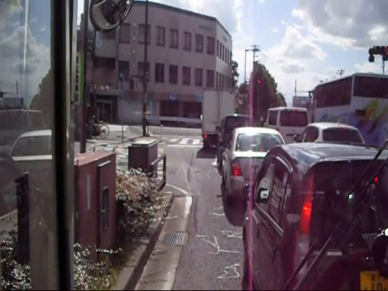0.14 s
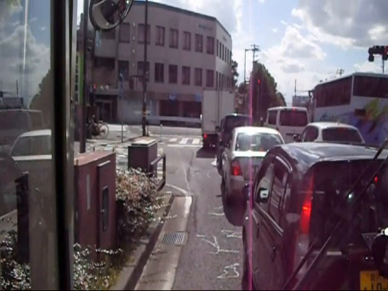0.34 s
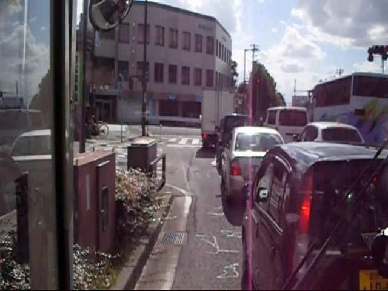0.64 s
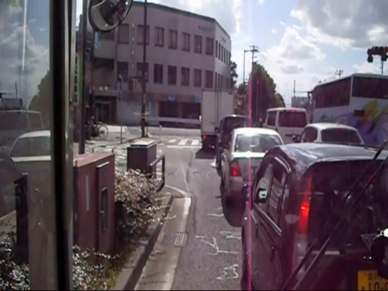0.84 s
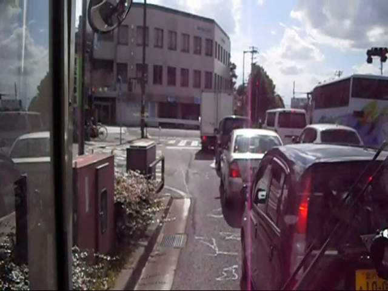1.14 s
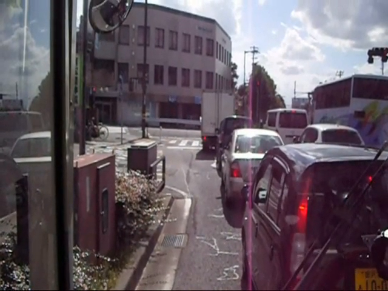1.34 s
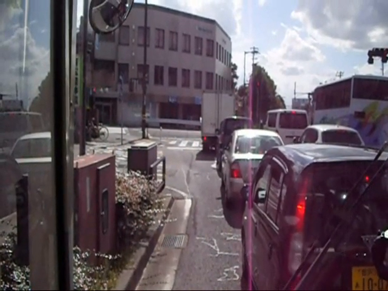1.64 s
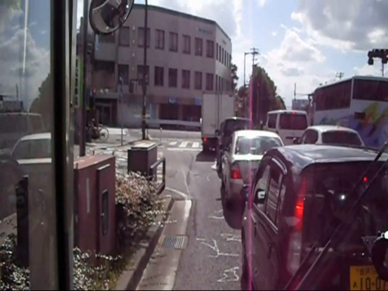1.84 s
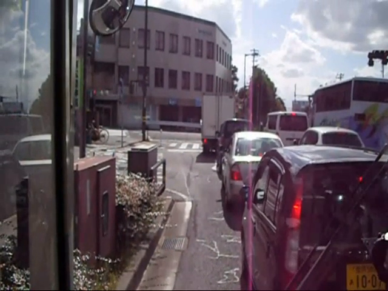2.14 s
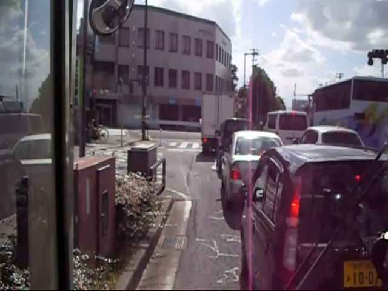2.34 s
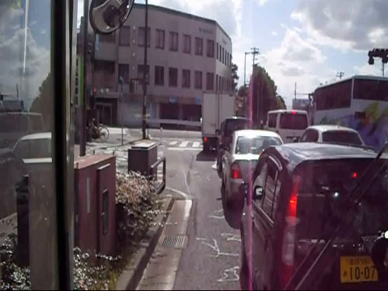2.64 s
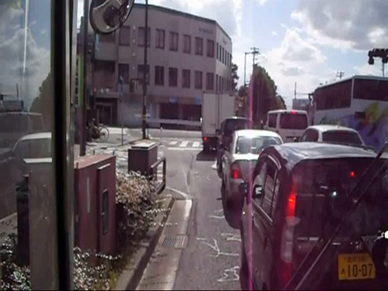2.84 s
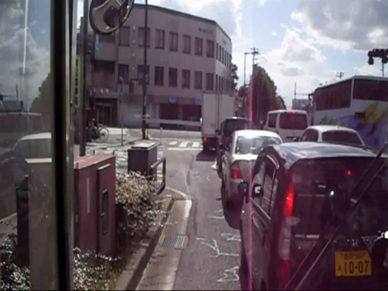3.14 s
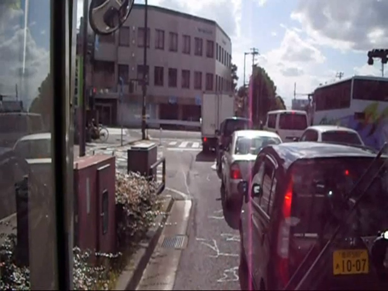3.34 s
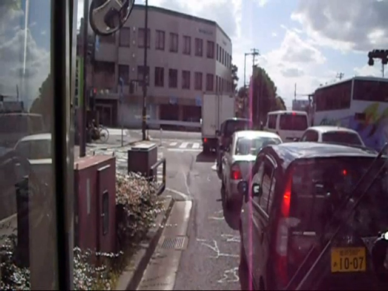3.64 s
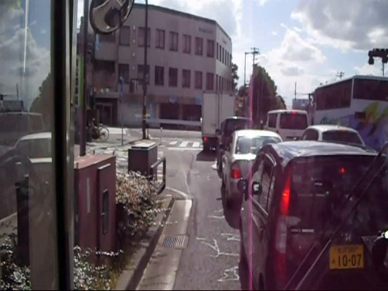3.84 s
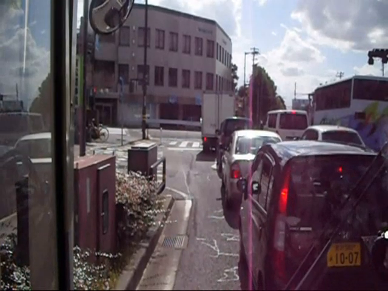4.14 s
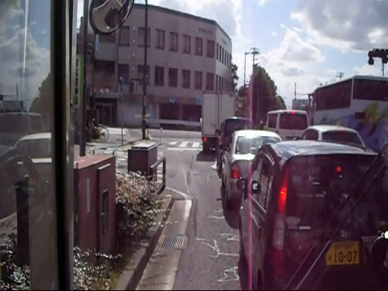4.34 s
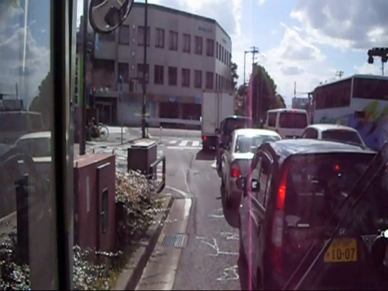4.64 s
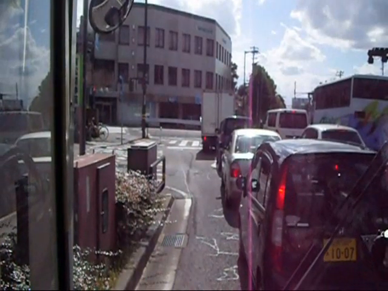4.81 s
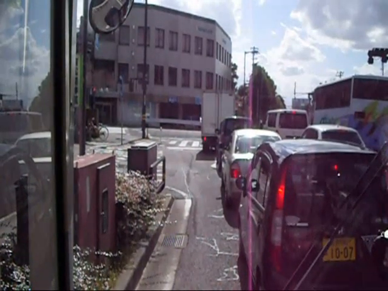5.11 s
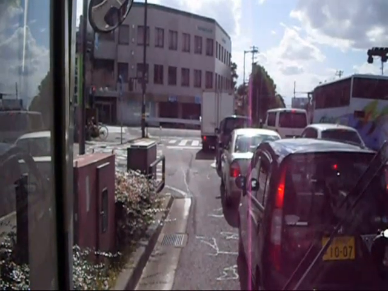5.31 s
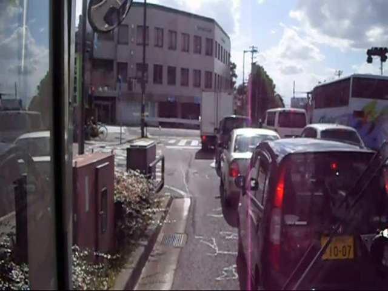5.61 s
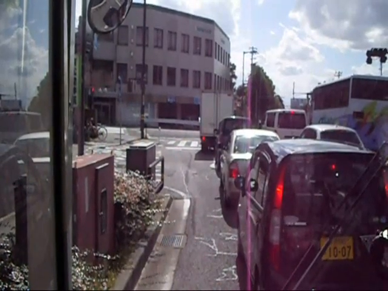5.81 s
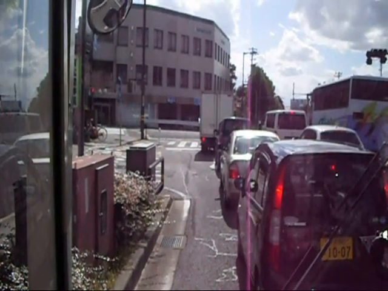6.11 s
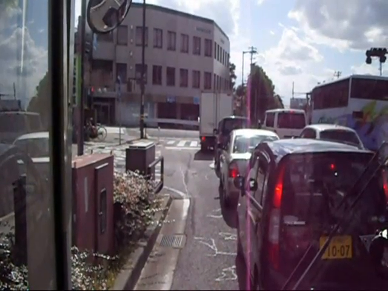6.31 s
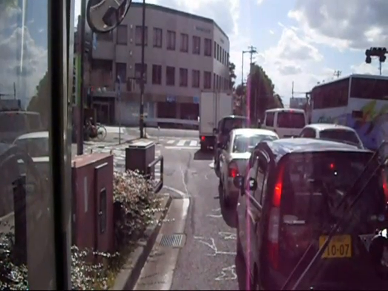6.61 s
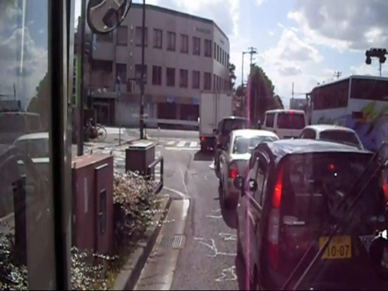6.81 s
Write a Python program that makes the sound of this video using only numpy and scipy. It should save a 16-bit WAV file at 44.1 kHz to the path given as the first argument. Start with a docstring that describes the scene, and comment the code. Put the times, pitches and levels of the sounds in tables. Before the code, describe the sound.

Inside a waiting bus, the diesel engine idles with a low throb while the turn signal clicks in an even tick-tock.

```python
"""A turn-signal relay ticks and tocks on the dashboard of a bus waiting in a queue: its contacts
snap, then the armature seats and rings the housing. Under it the diesel idles and booms in the body,
fans hum, loose trim rattles faintly and a fuzzy tone swells once.
A small camera adds its own hiss and a thin whine."""
import sys
import numpy as np
from scipy.fft import rfft, irfft, next_fast_len
from scipy.io import wavfile
from scipy.ndimage import map_coordinates

SR = 44100
rng = np.random.default_rng(int(sys.argv[2]) if len(sys.argv) > 2 else 0)


def store_wav(level_fs):
    """Save 16-bit WAV to argv[1]."""
    pcm = np.round(np.clip(np.atleast_2d(level_fs), -1, 1) * 32767)
    wavfile.write(sys.argv[1], SR, pcm.T.astype(np.int16))


N = 306936

# Camera hiss. Each row: frequency in Hz, density in dB per Hz.
HISS_SPECTRUM = [(1000, -104), (7000, -104.7), (15500, -106.5)]
# Envelope of the fuzzy tone. Each row: time in seconds, level in dB.
SWELL_ENVELOPE = [(0, -78), (2.9, -78), (3.15, -64), (3.4, -68), (3.8, -67), (4.1, -77), (6.96, -80)]
# Trim contacts. Each row: start in seconds, gain in dB, tilt in dB per octave.
TRIM_HITS = [(.215, 1, 6), (.294, 2, 2.5), (.668, 0, 6), (.832, 7.5, 1.5), (.846, 5, 0), (.864, 3, 0),
             (0.979, 1.5, 4.5), (3.131, 4.5, 0)]
# Trim noise before gain and tilt. Each row: frequency in Hz, density in dB per Hz.
TRIM_SPECTRUM = [(600, -110), (1200, -93), (2000, -94), (3300, -90), (5500, -96.5), (8000, -104),
                 (15000, -114)]
# Blower tones. Each row: multiple of the blade rate, level in dB.
BLOWER_HARMONICS = [(1, -49.5), (2, -53), (3, -65.7), (4, -60)]
# Belt-driven parts and shaking panels. Each row: frequency in Hz, level in dB.
HUM_TONES = [(18.1, -48.5), (21.7, -52), (49.1, -52), (58.2, -52), (85.5, -47.5), (87.8, -43), (146.8, -62),
             (170.6, -53), (175.2, -55.5), (201.7, -67), (235.4, -55), (294.1, -74), (470.6, -73)]
# Engine orders. Each row: multiple of the firing rate, level in dB.
ENGINE_ORDERS = [(2, -40), (2.251, -58), (3, -51.5), (3.5, -60.5), (4, -61.5), (4.5, -60), (5, -57.5),
                 (7, -67.5)]
# Bus body, shaken at random. Each row: centre in Hz, half-width in Hz, level in dB.
BODY_MODES = [(27.5, 1.3, -49), (56.4, 2.8, -44)]
# Engine and street through the cabin. Each row: frequency in Hz, density in dB per Hz.
ROAR_SPECTRUM = [(8, -71), (25, -56), (42, -58.7), (60, -62), (100, -62), (170, -66.5), (280, -75.5),
                 (450, -80.5), (850, -85), (1200, -89.5), (1500, -92.5), (2500, -95.7), (5000, -104),
                 (15000, -120)]
# Relay and housing. Each row: frequency in Hz, T60 in seconds, pull-in and release in relative dB.
RELAY_MODES = [(640, .07, -62, -63), (796, 0.077, -63, -49), (915, 0.067, -45, -56),
               (967, 0.066, -48.5, -49.5), (1126, 0.092, -55, -54), (1356, 0.057, -67, -57),
               (1530, 0.064, -63, -56), (1926, 0.057, -67, -56), (2164, 0.065, -75, -57),
               (2365, 0.055, -75, -57), (2600, .05, -74, -57), (2710, 0.083, -58, -56),
               (3235, 0.057, -61, -65), (3490, .04, -63, -61), (3796, 0.076, -61, -50),
               (4100, 0.15, -59, -71), (4400, 0.042, -65, -74), (4610, 0.033, -67, -73),
               (5210, 0.093, -65.5, -76), (5743, .04, -64, -74), (8000, 0.049, -58.5, -74),
               (8460, 0.048, -59, -69), (9090, 0.038, -54, -68), (11035, .035, -58, -69)]
# Dense ringing on pull-in. Each row: frequency in Hz, relative density in dB.
PULL_IN_SPECTRUM = [(400, -120), (900, -80), (2500, -98), (4000, -84), (6300, -94), (8300, -90),
                    (11000, -93.5), (13800, -92.5), (16000, -93)]
# Dense ringing on release. Each row: frequency in Hz, relative density in dB.
RELEASE_SPECTRUM = [(200, -100), (450, -83), (900, -85.5), (2200, -83), (3200, -91.5), (3900, -86),
                    (5000, -98), (7000, -99), (11000, -99), (16000, -102)]


def amp(db):
    return 10 ** (np.asarray(db) / 20)


def clock():
    return np.arange(N) / SR


def wobble(rate_hz):
    """Smooth random curve, rate_hz knots a second."""
    knots = rng.standard_normal(int(N * rate_hz / SR) + 4)
    return map_coordinates(knots, [clock() * rate_hz])


def filtered(x, response):
    size = next_fast_len(len(x) + SR // 4)
    return irfft(rfft(x, size) * response(np.fft.rfftfreq(size, 1 / SR)), size)[:len(x)]


def noise(spectrum, size):
    """Noise from rows of (Hz, dB per Hz)."""
    knots_hz, db = np.transpose(spectrum)
    white = rng.standard_normal(size) * np.sqrt(SR / 2)
    return filtered(white, lambda hz: amp(np.interp(np.log(hz + 1), np.log(knots_hz), db)))


def resonance(centre_hz, half_width_hz):
    """Narrow-band noise, rms 1."""
    band = filtered(rng.standard_normal(N), lambda hz: 1 / (1 + ((hz - centre_hz) / half_width_hz) ** 2))
    return band / np.sqrt(np.mean(band ** 2) + 1e-20)


def spin(hz, drift):
    """Phase in radians; the rate wanders by the fraction drift."""
    return 2 * np.pi * np.cumsum(hz * (1 + drift * wobble(3.01))) / SR


def tone(phase):
    """Sine, rms 1, random start."""
    return np.sqrt(2) * np.sin(phase + rng.uniform(0, 2 * np.pi))


def fade(t, attack_s, t60_s):
    t = np.maximum(t, 0)
    return (1 - np.exp(-t / attack_s)) * amp(-60 * t / t60_s)


def add(track, start_s, sound):
    part = track[round(start_s * SR):][:len(sound)]
    part += sound[:len(part)]


def camera_noise(whine_hz=15734, whine_db=-72, flutter_hz=13, flutter_depth=0.45):
    """The camera's own hiss and thin, fluttering whine."""
    whine = tone(2 * np.pi * whine_hz * clock())
    whine *= 1 + flutter_depth * tone(spin(flutter_hz, drift=0.043))
    return noise(HISS_SPECTRUM, N) + amp(whine_db) * whine


def swell():
    """A faint, fuzzy tone swells for a second."""
    level_db = np.interp(clock(), *np.transpose(SWELL_ENVELOPE))
    return amp(level_db) * resonance(centre_hz=1210, half_width_hz=70)


def trim():
    """A loose panel gives a few soft, dry rattles, each with its own brightness."""
    out = np.zeros(N)
    t = np.arange(SR // 6) / SR
    for start_s, gain_db, tilt in TRIM_HITS:
        spectrum = [(hz, db + tilt * np.log2(hz / 3000)) for hz, db in TRIM_SPECTRUM]
        rattle = noise(spectrum, len(t)) * fade(t, attack_s=0.0053, t60_s=0.12)
        add(out, start_s, amp(gain_db) * rattle)
    return out


def fans(blade_hz=123.93):
    """Blower and belt-driven parts hum unsteadily; close tones beat."""
    blades = spin(blade_hz, drift=0.00155)
    blower = sum(amp(db + 1.8 * wobble(7)) * tone(k * blades) for k, db in BLOWER_HARMONICS)
    hums = sum(amp(db + 1.67 * wobble(4)) * tone(spin(hz, drift=0.00203)) for hz, db in HUM_TONES)
    return blower + hums


def engine(firing_hz=27.19, firing_db=-37.5, drone_db=-43.5, beat_hz=0.924, beat_peak_s=2.25):
    """Diesel firing booms in the body and beats against a drone; uneven cylinders add orders."""
    firing = spin(firing_hz, drift=0.0026)
    beat = 2 * np.pi * beat_hz * (clock() - beat_peak_s)
    boom = amp(firing_db + 1.94 * wobble(4.6)) * np.sqrt(2) * np.sin(firing)
    drone = amp(drone_db) * np.sqrt(2) * np.sin(firing + beat)
    orders = sum(amp(db + 1.35 * wobble(4.02)) * tone(k * firing) for k, db in ENGINE_ORDERS)
    body = sum(amp(db) * resonance(hz, half_width_hz) for hz, half_width_hz, db in BODY_MODES)
    roar = noise(ROAR_SPECTRUM, N)
    throb_db = 0.4 * tone(firing) + 0.62 * wobble(14) + 0.3 * wobble(2.11)
    return boom + drone + orders + body + roar * amp(throb_db)


def relay_stroke(modes_db, spectrum, seat_s, attack_s, t60_s, cabin_db, cabin_t60_s):
    """Contacts snap; seat_s later the armature seats and knocks the housing's low modes."""
    t = np.arange(SR // 5) / SR
    ring = np.zeros(len(t))
    for (hz, mode_t60_s, *_), db in zip(RELAY_MODES, modes_db):
        age_s = t - seat_s * (hz < 3000)
        build_s = max(2.6 / hz, 0.0016)
        phase = 2 * np.pi * hz * age_s + rng.uniform(0, 2 * np.pi)
        ring += amp(db) * fade(age_s, build_s, mode_t60_s) * np.sin(phase)
    # Dashboard and windscreen reflect at once; the cabin lingers.
    early = noise(spectrum, len(t)) * fade(t, attack_s, t60_s)
    late = noise(spectrum, len(t)) * fade(t, 0.011, cabin_t60_s)
    return ring + early + amp(cabin_db) * late


def relay(blink_s=0.6884, release_s=0.1586, pull_in_s=0.5258, release_gain_db=-0.14, pull_in_gain_db=1):
    """One release and one pull-in per blink; the parts strike alike every time."""
    _, _, pull_in_db, release_db = np.transpose(RELAY_MODES)
    tick = relay_stroke(pull_in_db, PULL_IN_SPECTRUM, seat_s=0.0095, attack_s=0.0016, t60_s=0.049,
                        cabin_db=-10, cabin_t60_s=0.34)
    tock = relay_stroke(release_db, RELEASE_SPECTRUM, seat_s=0.006, attack_s=0.0022, t60_s=0.083,
                        cabin_db=-6.3, cabin_t60_s=0.19)
    out = np.zeros(N)
    for first_s, db, stroke in (release_s, release_gain_db, tock), (pull_in_s, pull_in_gain_db, tick):
        for start_s in np.arange(first_s, N / SR, blink_s):
            add(out, start_s, amp(db) * stroke)
    return out


def scene():
    return (relay() + trim() + engine() + fans() + swell())[None]


def record(dry, cutoff_hz=15850):
    """Camera noise added, then a hard low-pass."""
    return filtered(dry[0] + camera_noise(), lambda hz: hz < cutoff_hz)[None]


dry = scene()
out = record(dry)
store_wav(out)
```